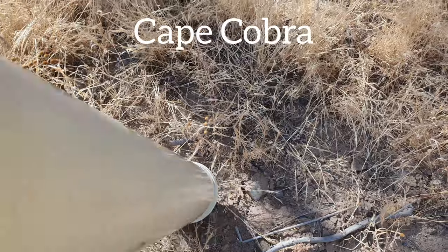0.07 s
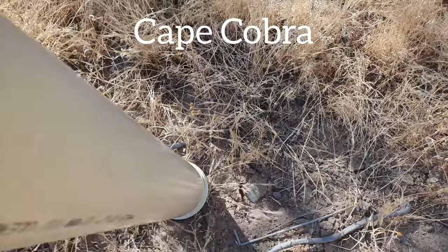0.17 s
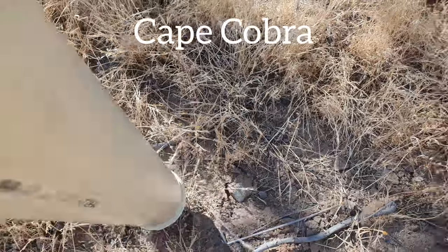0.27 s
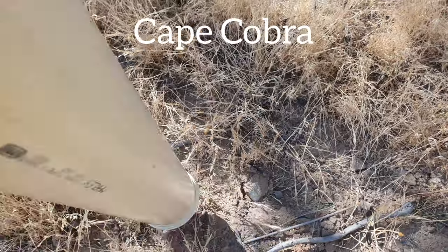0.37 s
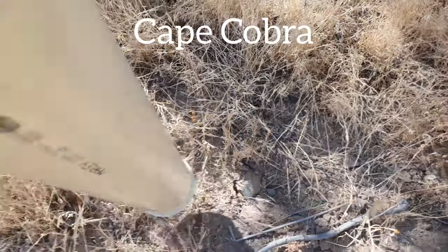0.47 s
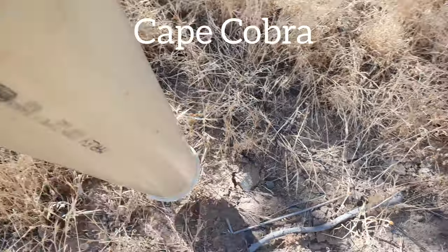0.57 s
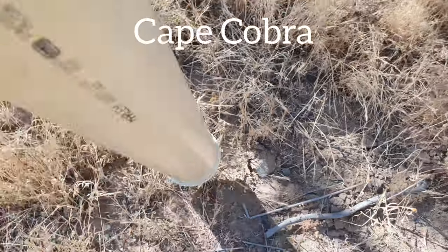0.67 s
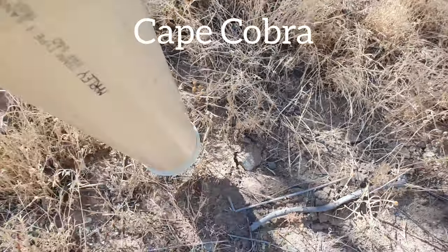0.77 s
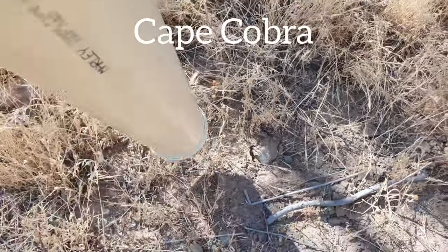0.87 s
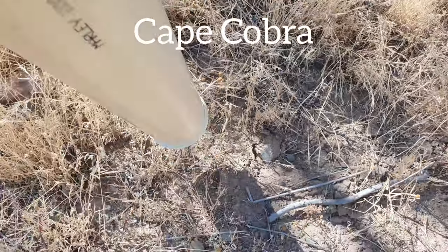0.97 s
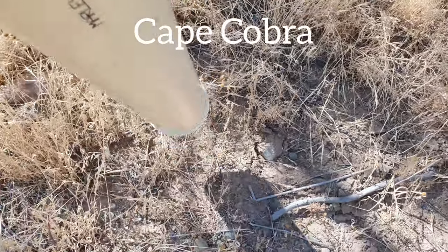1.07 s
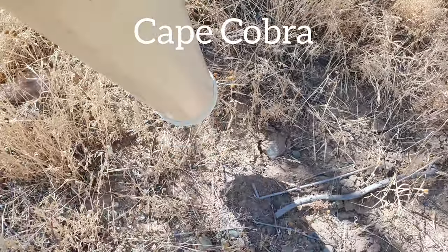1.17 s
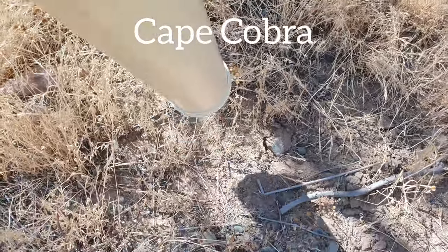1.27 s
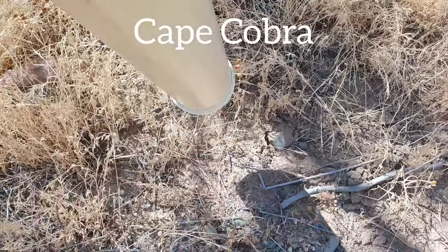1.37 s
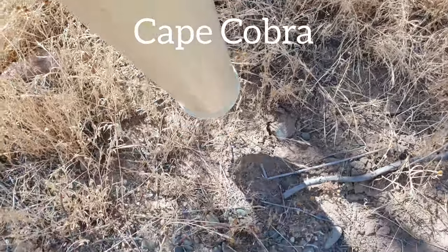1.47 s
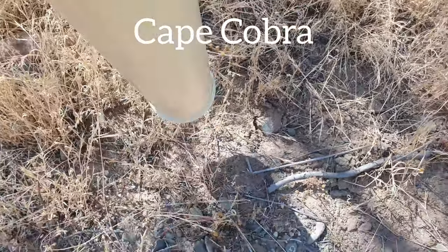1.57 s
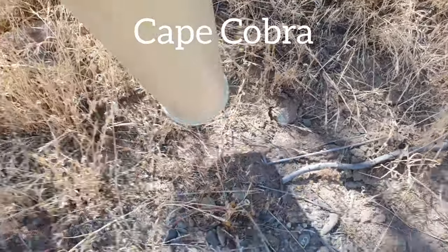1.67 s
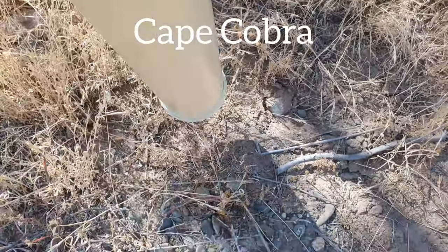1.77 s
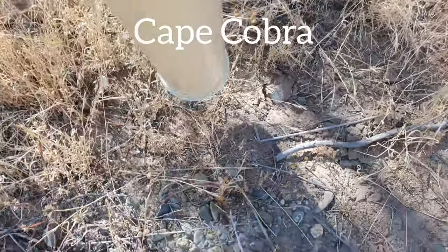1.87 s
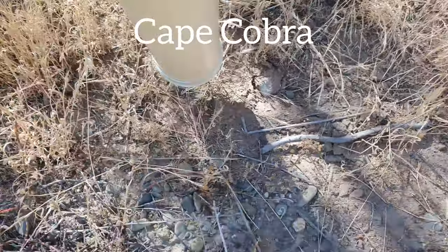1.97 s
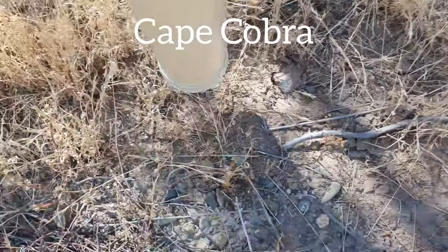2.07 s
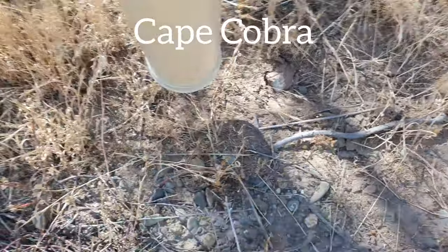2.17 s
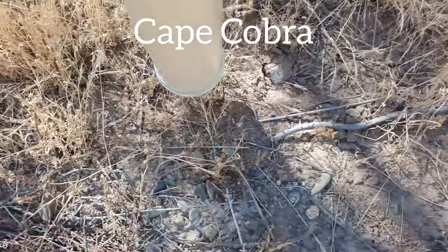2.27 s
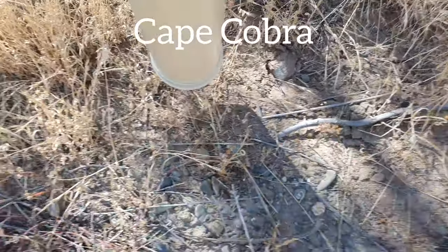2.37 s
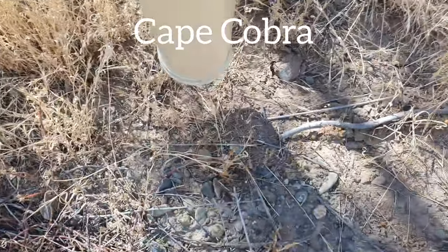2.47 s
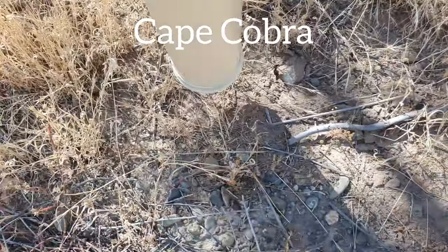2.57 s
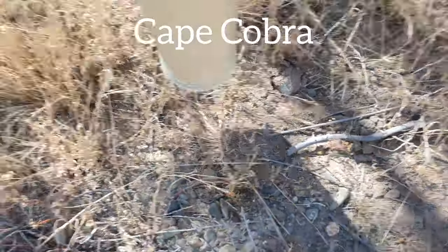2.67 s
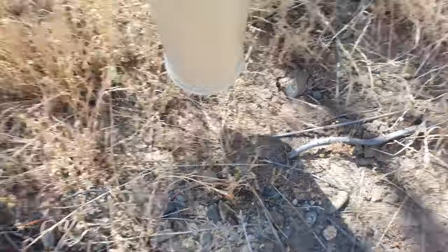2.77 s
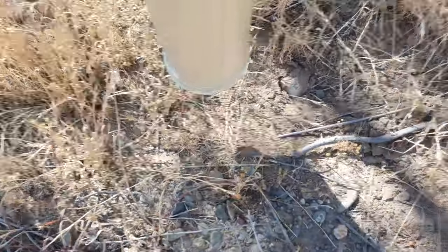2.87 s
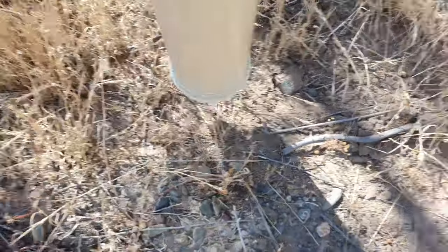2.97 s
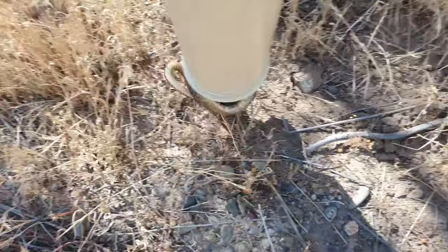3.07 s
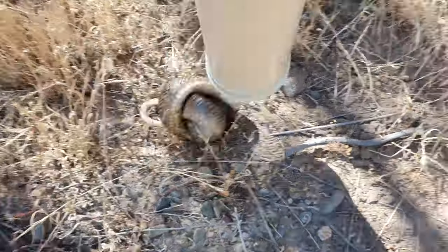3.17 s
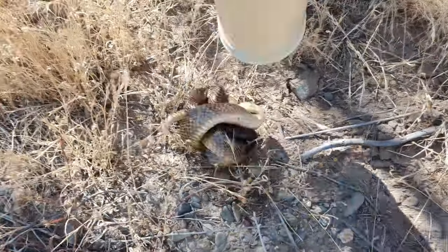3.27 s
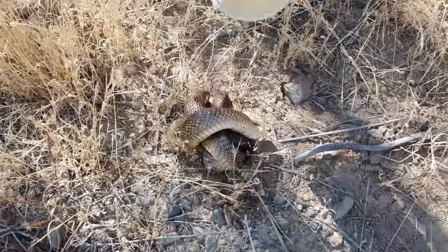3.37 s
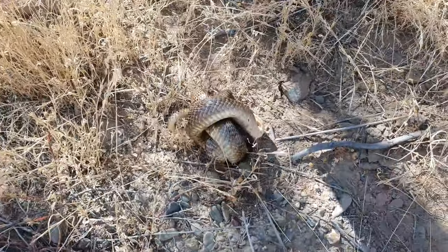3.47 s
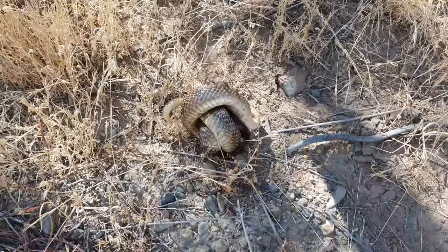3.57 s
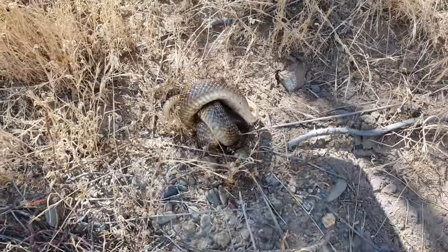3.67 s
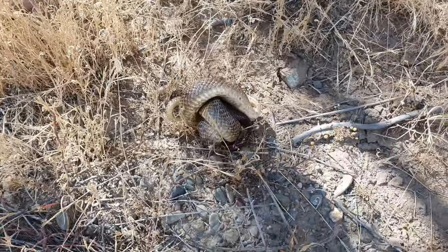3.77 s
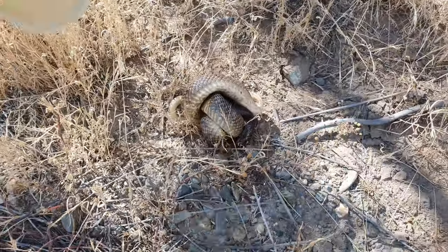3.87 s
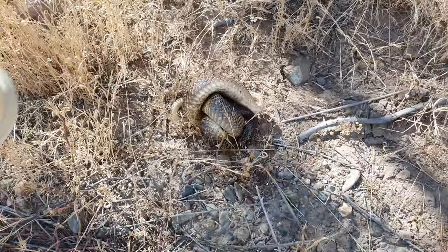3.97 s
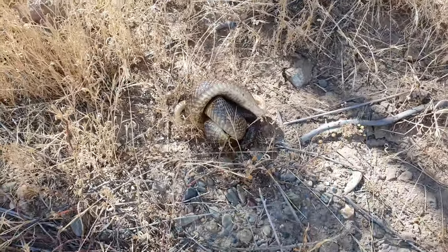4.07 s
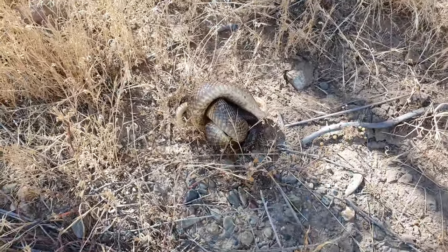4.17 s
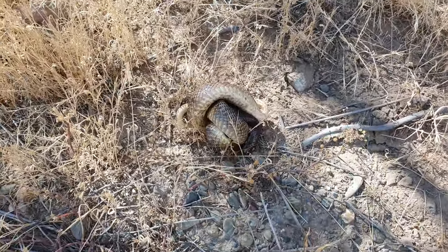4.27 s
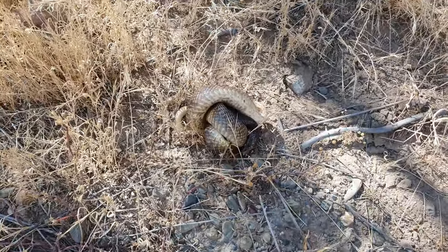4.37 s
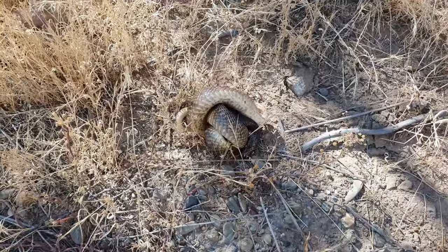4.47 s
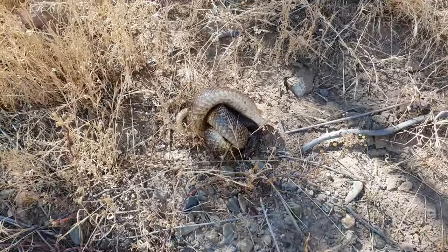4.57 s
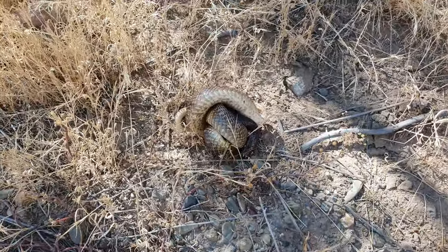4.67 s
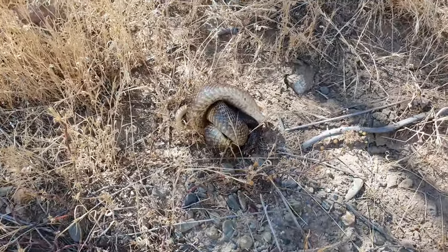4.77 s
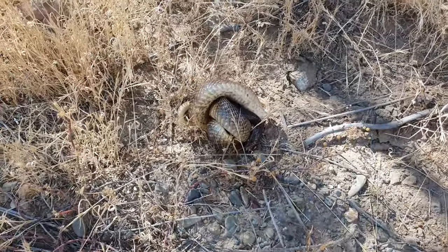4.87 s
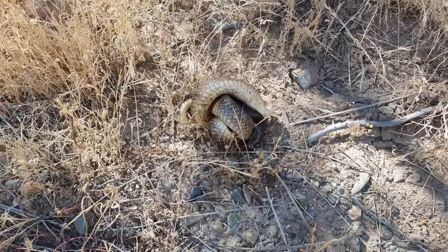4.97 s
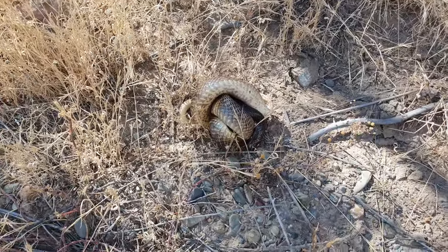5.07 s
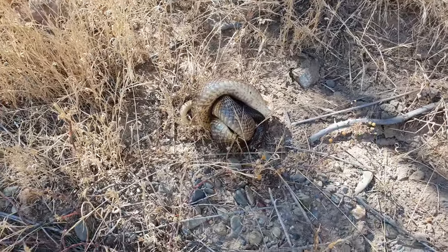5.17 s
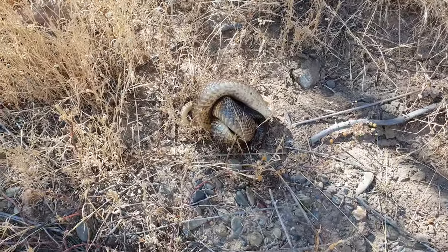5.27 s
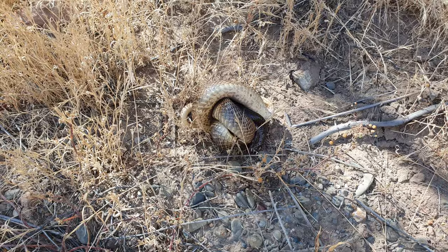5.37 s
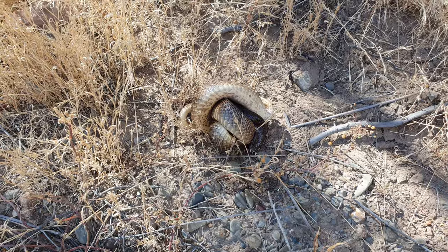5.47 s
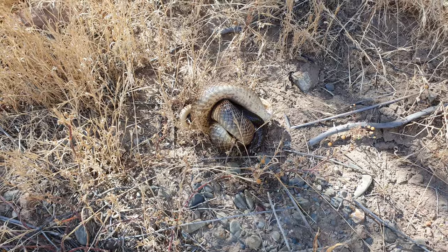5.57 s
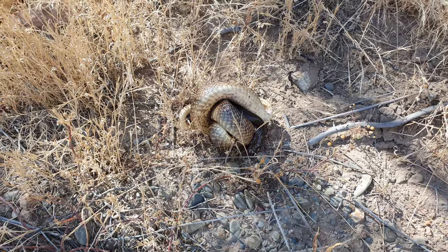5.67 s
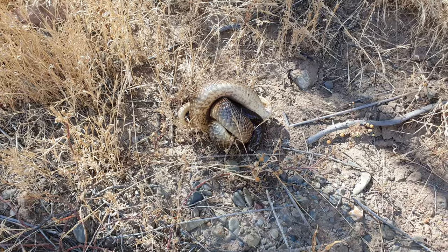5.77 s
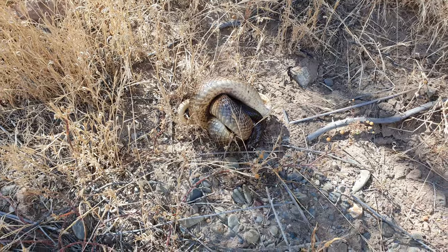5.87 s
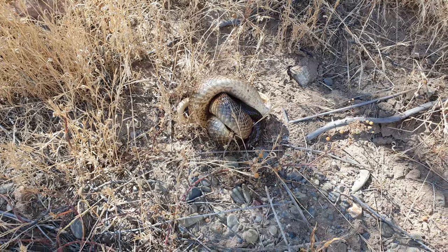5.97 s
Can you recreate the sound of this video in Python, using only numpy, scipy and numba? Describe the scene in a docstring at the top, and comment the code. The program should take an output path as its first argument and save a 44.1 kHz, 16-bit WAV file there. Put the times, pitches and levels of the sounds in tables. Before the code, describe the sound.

From 0 s a plastic tube is shaken close to a handheld stereo microphone outdoors. Short swells of dry hiss and scaly scraping come about seven a second, strongest at the start and leaning left, with a hollow ring inside the tube and a low rustle beneath. Gusty wind rumbles and slaps the microphone, heaviest until about 1.6 s and again around 2.1-2.8 s. Stones crack near 0.15 and 0.43 s, then hollow knocks cluster around 3.05 s as the load slides out. The shaking and wind fade by 3.5-4 s, exposing a thin, high cicada buzz, present throughout, and two very faint bird whistles near 3.9 and 4.1 s. From 4.25 s ticks build into sharp gravel snaps and gritty crunches, brightest at 4.6 s and dense again at 4.83-5 s, ringing the tube wall over a faint low hollow hum. Sparse small clicks follow to 6 s over a quiet open-country murmur.

```python
"""A plastic tube is shaken to slide a coiled snake out onto dry grass, then is set down on gravel.
Each shake is a swell of tiny random contacts that hisses, scrapes and rings the air in the tube.
Wind is shaped noise with sudden dips at two microphone ports; a cicada is a buzz of fast clicks.
Stones and stems snap as short noise bursts that ring the tube, over a quiet open-country murmur.
Later come a far bird's dipping whistles, dense grit, and a low note from the tube's air column."""
import sys
import numpy as np
from scipy import signal
from scipy.fft import rfft, irfft, next_fast_len
from scipy.io import wavfile
from scipy.ndimage import uniform_filter1d
from numba import njit

SR = 44100
rng = np.random.default_rng(int(sys.argv[2]) if len(sys.argv) > 2 else 0)


def wrap_up_sound(samples):
    """Save the sound to the file named by the first command line argument, as 16-bit audio."""
    columns = np.atleast_2d(samples).T
    # keep every value between -1 and 1, then stretch to whole-number steps
    tamed = np.clip(columns, -1, 1)
    steps = np.round(tamed * 32767).astype(np.int16)
    wavfile.write(sys.argv[1], SR, steps)


N = 265482
T = np.arange(N) / SR  # time of every sample, s


def undb(db):
    """Turn decibels into a plain gain."""
    return 10 ** (np.asarray(db) / 20)


def unit(x):
    """Scale to an rms (average strength) of 1."""
    return x / np.sqrt(np.mean(x ** 2))


def curve(rows):
    """Join each column of a table by straight lines in time; levels are silent outside it."""
    s, *columns = np.transpose(rows)
    return [np.interp(T, s, c, left=-120, right=-120) for c in columns]


def colour(x, points):
    """Make some pitches stronger than others, following (Hz, dB) points."""
    size = next_fast_len(N)
    hz, db = np.transpose(points)
    bin_hz = np.arange(size // 2 + 1) * SR / size
    gain = undb(np.interp(np.log(bin_hz + 1), np.log(hz), db))
    return irfft(rfft(x, size) * gain, size)[..., :N]


def ring(x, modes):
    """Add up resonances of a struck body, neighbours in opposite sign."""
    total = 0
    for k, (hz, width, db) in enumerate(modes):
        tone = signal.lfilter(*signal.iirpeak(hz, hz / width, SR), x)
        total = total + (-1) ** k * undb(db) * tone
    return total


def band(x, lo_hz, hi_hz):
    """Keep mainly the pitches between two limits (Butterworth band-pass)."""
    return signal.sosfilt(signal.butter(2, [lo_hz, hi_hz], "band", fs=SR, output="sos"), x)


@njit
def svf(x, hz, width):
    """Resonance whose centre can move every sample (state-variable band-pass)."""
    y, b, l = np.empty(len(x)), 0., 0.
    for i in range(len(x)):
        g, k = np.tan(np.pi * hz[i] / SR), width / hz[i]
        v = (b + g * (x[i] - l)) / (1 + g * (g + k))
        b, l, y[i] = 2 * v - b, l + 2 * g * v, k * v
    return y


def walk(rate):
    """Random levels, rate per second, smoothed into a wandering curve with a spread near 1."""
    k = int(SR / rate)
    steps = np.repeat(rng.standard_normal(N // k + 1), k)
    return 1.296 * uniform_filter1d(uniform_filter1d(steps, k), k)[:N]


def grains(rate, spread_db):
    """Tiny random contacts, rate per second: few large, many small, none huge."""
    chance = rng.random((3, N))
    hit, sign = chance[0] < rate / SR, np.sign(chance[1] - .5)
    size = undb(-spread_db * np.log(1.003 - chance[2]))
    return unit(hit * sign * size)


def ports(source, alike, lead):
    """A shared sound reaches the left port lead samples early; the rest differs between ports."""
    shared, alike = source(), np.clip(alike, 0, 1)
    pair = np.array([shared, np.roll(shared, int(round(lead)))])
    return np.sqrt(alike) * pair + np.sqrt(1 - alike) * np.array([source(), source()])


def split(pan_db):
    """Left and right gains of unrelated sounds whose mean has gain 1."""
    return 2 / np.sqrt(1 + undb(np.array([-pan_db, pan_db])) ** 2)


# Shakes of the tube, levels before each layer's trim:
# [start t/s, length/s, hiss level/dB, scrape over hiss/dB, hollow ring over hiss/dB]
SHAKE_STROKES = [(0.152, 0.1, -43, 2, 6.5), (0.381, 0.056, -46.5, 3.5, -5), (0.464, 0.031, -65.5, 7, 12.5),
                 (0.528, 0.084, -45.5, 1, 0.5), (0.693, 0.063, -47.5, 3.5, -4.5),
                 (0.826, 0.06, -52.5, 4.5, -5), (0.963, 0.064, -50.5, 3.5, -12),
                 (1.099, 0.06, -58.5, 6.5, -8), (1.223, 0.047, -63.5, 9, -4), (1.353, 0.059, -51, 5.5, -14),
                 (1.487, 0.089, -51, 5.5, 1), (1.632, 0.061, -52.5, 4.5, -4), (1.78, 0.08, -53, 0.5, -1),
                 (1.938, 0.089, -49, 3, 10.5), (2.102, 0.065, -52.5, 2.5, 0.5), (2.235, 0.087, -51, 2, 6.5),
                 (2.392, 0.083, -50, 2, 2.5), (2.506, 0.035, -69, 15, 12), (2.571, 0.097, -49.5, 5.5, 6.5),
                 (2.759, 0.088, -56.5, 0, 3), (2.976, 0.068, -58, 9, 17), (3.035, 0.052, -53.5, 7, 18),
                 (3.124, 0.075, -55.5, -2.5, 3), (3.229, 0.052, -55.5, -12, -7),
                 (3.342, 0.15, -62.5, 1.5, -1.5), (3.56, 0.12, -69.5, -13, -6),
                 (3.722, 0.11, -69.5, -0.5, -1.5), (3.907, 0.12, -75, -3, -6), (4.246, 0.031, -78, 14, -6)]
# Low rustle running under and between the shakes, before the scrape trim: [t/s, level/dB]
LOW_RUSTLE = [(0, -50), (0.2, -54), (0.33, -58.5), (0.66, -58), (1.3, -65.5), (1.9, -54.5), (2.6, -60.5),
              (2.9, -54.5), (3.3, -60.5), (3.5, -77), (4.15, -82), (4.3, -73)]
# The tube swings from the left to the front: [t/s, hiss left minus right/dB]
TUBE_SWING = [(0, 9), (1.2, 15), (1.8, 6), (2.9, 4), (3.2, -1), (6.02, 2)]
# The air space in front of the sliding load: [t/s, resonance f/Hz, overtone level/dB]
AIR_SPACE = [(0, 437, 1.5), (.6, 473, -6), (1.5, 309, -20), (1.9, 330, -25), (2, 401, -18),
             (2.27, 488, -27), (2.6, 383, -9.5), (3, 329, -22), (6.02, 350, -18)]
# Tone colour of the scraping: [f/Hz, level/dB]
SCRAPE_COLOUR = [(900, -8), (1400, -12), (1900, -5), (2750, -3.5), (3900, -0.5), (4700, -4), (5600, -8),
                 (6600, -5.5), (7700, -15.5), (9000, -18.5)]
# Tone colour of the hiss, used for the grit's treble too: [f/Hz, level/dB]
HISS_COLOUR = [(6000, -12.5), (8000, -11), (10000, -7.5), (12500, -3), (15800, -3.5)]


def shakes():
    """Each stroke speeds the load up and stops it: a flat-topped swell drives hiss, scrape and ring."""
    hiss, scrape, hollow = np.zeros(N), undb(curve(LOW_RUSTLE)[0]), np.zeros(N)
    for s, length, db, scrape_db, ring_db in SHAKE_STROKES:
        at = slice(max(int((s - length) * SR), 0), int((s + 2 * length) * SR))
        from_middle = np.abs((T[at] - s) / length * 2 - 1)
        stroke = undb(db + 3.5 - 6.35 * from_middle ** 2.58)
        hiss[at] += stroke
        scrape[at] += undb(scrape_db) * stroke
        hollow[at] += undb(ring_db) * stroke
    catch = walk(60)  # the scales catch and slip, so hiss and scrape flicker together
    hiss_noise = unit(colour(ports(lambda: grains(12000, 3.1), 0.14, 24), HISS_COLOUR))
    out = undb(2.5 * catch) * hiss * split(curve(TUBE_SWING)[0]) * hiss_noise
    scrape_noise = unit(colour(ports(lambda: grains(6000, 1.84), 0.083, 20), SCRAPE_COLOUR))
    out += undb(1.0 + 2.48 * catch) * scrape * scrape_noise
    out[1] -= 0.59 * ring(out[1], [(2650, 1160, 0)])  # this band is weaker at the right port
    rub = undb(2.0 * walk(39.93)) * hollow * ports(lambda: grains(1500, 4.06), 0.86, 8.27)
    hz, over_db = curve(AIR_SPACE)
    # the closed air space rings at its note and near four times higher
    boom = np.array([svf(x, hz, 28.8) + undb(over_db) * svf(x, 3.98 * hz, 185.0) for x in rub])
    return out + undb(21.5) * boom + undb(5) * band(rub, 194, 1690)


# Gusting wind on the ports, under the eddies: [t/s, level/dB, left minus right/dB]
GUSTING_WIND = [(0, -50.5, -3), (.3, -37.5, 15), (.6, -37.5, 10), (.8, -37.5, -0.5), (1.05, -45, -2),
                (1.25, -36.5, 8), (1.5, -35, 9), (1.75, -52.5, 3), (2.05, -51, 2), (2.4, -42, 2),
                (2.8, -41, 4), (3.2, -53, 9), (3.6, -53.5, 21), (4, -65, -8), (4.28, -68.5, -6),
                (4.6, -47, 9), (4.7, -65.5, 2), (4.9, -49.5, 0), (5.2, -67, 6), (6.02, -65.5, 2)]
# Eddies that slap the ports, slap level before its filter and trim:
# [t/s, slap level/dB, left minus right/dB, rumbling wake level/dB]
EDDY_SLAPS = [(0.061, -44, -11, -35.5), (0.152, -33, 6, -23), (0.325, -31, -4, -33), (0.35, -21, 29, -30),
              (0.398, -25.5, 17, -17), (0.476, -17.5, 22, -19), (0.55, -40, 21, -21), (0.63, -46, 10, -30),
              (0.679, -30, 23, -26.5), (0.781, -36, -18, -33.5), (0.841, -30, -18, -38),
              (0.991, -48, -4, -35), (1.087, -38, 21, -33), (1.186, -32.5, 18, -27.5),
              (1.259, -26, 16, -31.5), (1.36, -39, 22, -32), (1.461, -39, 22, -31),
              (1.821, -45, -20, -33.5), (2.094, -23.5, -28, -24.5), (2.17, -39, -10, -36),
              (2.26, -31.5, -18, -24), (2.32, -46, 10, -26.5), (2.431, -43, -2, -36),
              (2.523, -35, -30, -23), (2.578, -38, -33, -20), (2.713, -53, -9, -27.5),
              (2.791, -47, -4, -29), (2.941, -47, 19, -35.5), (3.032, -42, -2, -29), (3.242, -48, 17, -46),
              (3.341, -29, 36, -38), (3.389, -54, 32, -30), (3.514, -40, 32, -32.5), (3.628, -54, 19, -41),
              (3.822, -58, -2, -45.5), (4.441, -55, -6, -49), (5.34, -69, -2, -44), (5.396, -50, -15, -44)]
# Tone colour of the wind's rumble: [f/Hz, level/dB]
WIND_COLOUR = [(12, -56), (25, -15), (43, -4.5), (62, 4.5), (100, -3.5), (160, -17), (250, -25.5),
               (500, -44), (1000, -59)]
WAKE_RISE_S, WAKE_FALL_S = .012, 0.036


def wind():
    """Unrelated, lumpy turbulence on each port; eddies add a sharp pressure dip and a rumbling wake."""
    db, pan_db = curve(GUSTING_WIND)
    lumps = np.array([undb(1.88 * walk(24.94)) * colour(rng.standard_normal(N), WIND_COLOUR)
                      for _ in range(2)])
    slap, power = np.zeros((2, N)), (undb(db) * split(pan_db)) ** 2
    u = np.arange(-400, 400) / SR / .0022  # time around a dip, in units of 2.2 ms
    for s, peak_db, side_db, wake_db in EDDY_SLAPS:
        at = int((s + 0.00854) * SR)
        slap[:, at - 400:at + 400] -= np.outer(undb(peak_db) * split(side_db), np.exp(-u ** 2))
        near = slice(max(at - 6000, 0), at + 12000)
        late = T[near] - at / SR
        wake = np.exp(-np.abs(late) / np.where(late < 0, WAKE_RISE_S, WAKE_FALL_S))
        power[:, near] += np.outer(undb(wake_db) * split(side_db), wake) ** 2
    return np.sqrt(power) * unit(lumps) + undb(8) * band(slap, 61, 570)


# How fast the cicada clicks, before its small sway: [t/s, click rate f/Hz]
CICADA_RATE = [(0, 378.5), (1.25, 395.2), (1.75, 399), (1.95, 399), (2.35, 376.5), (2.5, 371),
               (2.85, 364.8), (3.4, 364.5), (4.1, 365.8), (5, 373.1), (6.02, 383.5)]
# Loudness of the cicada's clicks, before the left/right offset: [t/s, level/dB]
CICADA_LEVEL = [(0, -62.5), (0.4, -61.5), (2, -59), (3, -54), (3.4, -65), (3.8, -59.5), (4, -65.5),
                (4.4, -58), (4.7, -61), (6.02, -62.5)]
# Ringing of the insect's body: [f/Hz, level/dB]
CICADA_COLOUR = [(5500, -26), (6100, -16), (6500, -7), (6950, -3), (7300, -5), (7650, -5), (7950, -5.5),
                 (8400, -19.5), (8900, -36), (10000, -50)]
BLUR = .42  # gain of the blurred hiss beside the clicks


def cicada():
    """Regular clicks ring the body; a slower beat sways timing and strength; others blur into a hiss."""
    beat = 2 * np.pi * np.cumsum(57 + 1.2 * walk(3)) / SR  # about 57 Hz
    phase = np.cumsum(curve(CICADA_RATE)[0] * (1 + .0006 * walk(30))) / SR + .0055 * np.sin(beat + 1)
    clicks = np.zeros(N)
    for k in range(15, 26):  # multiples of the click rate
        flicker = undb(4 * walk(2) + 1.5 * walk(50))
        clicks += flicker * np.cos(2 * np.pi * k * (phase + k * .07))
    near = unit(colour(clicks * (1 + .4 * np.cos(beat)), CICADA_COLOUR))
    far = unit(colour(rng.standard_normal((2, N)), CICADA_COLOUR))
    level = undb(curve(CICADA_LEVEL)[0] + np.array([[-1.1], [1.1]]))  # a little louder at right
    return level * (np.array([near, np.roll(near, shift=20)]) + BLUR * far)


# Tone colour of the open-country murmur: [f/Hz, level/dB]
FIELD_COLOUR = [(60, -6), (130, 2.5), (300, -6.5), (700, 0.5), (1100, -10), (1800, -2.5), (2600, -23),
                (5000, -22), (9000, -21.5), (15800, -50)]
FIELD_DB = -62.5  # middle of a slightly wandering level


def field():
    """Open-country murmur and the phone's own hiss, as one shaped noise."""
    murmur = colour(ports(lambda: rng.standard_normal(N), 0.47, -10.5), FIELD_COLOUR)
    return undb(FIELD_DB + 0.13 * walk(2.4)) * unit(murmur)


# Single stones and stems snapping, levels before each layer's trim:
# [t/s, level/dB, crack f/Hz, hollow ring over level/dB, treble over level/dB, crumbling decay/ms]
STONE_SNAPS = [(0.1541, -17, 1870, -3.5, -23, 3.6), (0.435, -24.5, 1820, -5, -9, 1.5),
               (2.713, -34.5, 4450, -6, -16, 1), (3.019, -21, 1530, -2, -16.5, 2.3),
               (3.0505, -20.5, 1930, -3.5, -25, 2.2), (3.0648, -20.5, 3770, -11, -23, 2.3),
               (3.2585, -38, 4060, -6, -4, 1.8), (3.338, -37, 4500, -26, 3, 1.2),
               (3.5, -49, 5060, -15, -14, 1), (4.2577, -41.5, 2230, -22, -23, 1.3),
               (4.3193, -34.5, 3450, -31, -21, 3.6), (4.3481, -36.5, 2270, -15, -20, 1.5),
               (4.437, -36, 3370, -17, -19, 1.2), (4.4718, -34, 3420, -29, -24, 1.4),
               (4.5114, -33, 2150, -20, -19, 1.8), (4.5467, -28, 1560, -11, -17, 1.3),
               (4.5571, -22.5, 2420, -5.5, -11, 1.7), (4.568, -18.5, 2420, -8.5, -18, 2.4),
               (4.5933, -26, 2240, -6, -20, 1.5), (4.6116, -12.5, 2620, -13.5, -8.5, 0.87),
               (4.6188, -25, 2420, -23, -21, 1.7), (4.6457, -28.5, 2270, 0, -33, 1.3),
               (4.762, -40, 3830, -4, -26, 2.7), (4.7937, -39.5, 1980, 2, -22, 1.5),
               (4.829, -22, 3300, -10, -26, 4.4), (4.8441, -21.5, 2220, -17, -8, 1.4),
               (4.8577, -27, 2260, -0.5, -20, 4.9), (4.8682, -17.5, 2280, -0.5, -9, 1.9),
               (4.882, -22, 1610, -5.5, -19, 1.9), (4.9267, -21, 3200, -17, -12, 1.9),
               (4.943, -19, 2380, -4, -9, 1.8), (4.98, -24, 2250, -15, -31, 2.8),
               (5.001, -33, 2230, -17, -26, 1.8), (5.061, -48, 900, 0, -32, 1.5),
               (5.084, -29, 2800, -9.5, -31, 4.3), (5.137, -39.5, 3300, -6, -28, 2.9),
               (5.192, -40, 4200, -30, -16, 1.1), (5.2435, -46, 2580, -18, -28, 1.3),
               (5.2606, -39.5, 2300, -15, -32, 1.8), (5.4396, -40.5, 2170, -15, -36, 2.1),
               (5.553, -50, 2500, -21.5, -30, 1.4), (5.8769, -30.5, 2300, -11, -35, 0.95),
               (5.97, -34, 1960, -2, -32, 1.3)]
# Ringing of the tube wall, used for the grit too: [f/Hz, width/Hz, level/dB]
WALL_MODES = [(1636, 61, 5.5), (1934, 50, 5), (2254, 117, 6), (2527, 38, 8), (2665, 17, 2.5),
              (3340, 245, -1), (3670, 560, -16), (4870, 33, -25), (6150, 170, -14)]
# Low ringing of the tube's hollow, used for the grit too: [f/Hz, width/Hz, level/dB]
HOLLOW_MODES = [(308, 48, -11), (597, 74, -11.5), (726, 69, -6), (1180, 37, -0.5)]
BREAK = 4  # size of the first crack beside its crumbling
SNAP_WALL_DB = 5  # trim of the wall ring


def snaps():
    """Each snap is a crack with a crumbling noise tail that knocks the tube wall and its hollow."""
    out, knock, low, high = (np.zeros((2, N + 2000)) for _ in range(4))
    fade = np.arange(1000) / SR
    # the right port hears each snap 13 samples late
    at = np.array([[0], [1]]), np.array([[0], [13]]) + np.arange(len(fade))
    burst = rng.standard_normal((len(STONE_SNAPS), 3, len(fade)))
    for (s, db, hz, ring_db, treble_db, ms), (both, *own) in zip(STONE_SNAPS, burst):
        crack = (both + .5 * np.array(own)) * np.exp(-fade * 1000 / max(ms, .2))
        crack[:, :2] += BREAK * np.array([1, .3])
        crack *= undb(db) / np.sqrt((crack ** 2).sum(-1, keepdims=True) / 30)  # even out the energy
        here = at[0], at[1] + int(s * SR)
        out[here] += undb(2.5) * band(crack, hz / 1.63, hz * 1.644)
        knock[here] += crack
        low[here] += undb(ring_db) * crack
        high[here] += undb(treble_db) * crack * np.exp(-fade / 0.00077)
    out = out[:, :N] + undb(SNAP_WALL_DB) * ring(knock[:, :N], WALL_MODES)
    out += undb(23.5) * ring(low[:, :N], HOLLOW_MODES)
    return out + undb(.1) * band(high[:, :N], 3700, 14200)


# Far whistles, levels before a random flicker:
# [t/s, length/s, start f/Hz, f at 60 % of the length/Hz, end f/Hz, level/dB]
BIRD_PEEPS = [(3.89, .1, 6300, 5350, 5550, -76), (4.07, .11, 5250, 5100, 5200, -76)]


def bird():
    """Faint whistles: pure tones that dip in pitch along a smooth curve."""
    out = np.zeros(N)
    for s, length, start_hz, low_hz, end_hz, db in BIRD_PEEPS:
        u = np.clip((T - s) / length, 0, 1)
        hz = np.polyval(np.polyfit([0, .6, 1], [start_hz, low_hz, end_hz], deg=2), u)
        swell = np.sqrt(np.sin(np.pi * u) + 1e-12)
        out += undb(db) * swell * np.sin(2 * np.pi * np.cumsum(hz) / SR)
    return out * undb(3.7 * walk(150))


# The tube pressed into grit, a swell to a peak and a fade, levels before each layer's trim:
# [peak t/s, level/dB, treble over level/dB, rise/(dB/s), fall/(dB/s)]
GRIT_CRUNCH = [(4.45, -59.5, -9.5, 67, 44), (4.601, -40, -16, 153, 333), (4.86, -41.5, -16, 500, 255),
               (4.95, -51.5, -12, 194, 157), (5.1, -73, -19, 95, 20), (5.89, -65.5, -21, 297, 36)]
GRIT_HOLLOW_DB = -4.5  # hollow ring beside the wall ring


def grit():
    """Dense tiny contacts knock the tube wall and its hollow, with a hiss of finer ones on top."""
    body, treble = np.zeros(N), np.zeros(N)
    for s, db, treble_db, rise, fall in GRIT_CRUNCH:
        swell = undb(db - np.where(T < s, rise * (s - T), fall * (T - s)))
        body += swell
        treble += undb(treble_db) * swell
    contacts = ports(lambda: grains(900, 4.87), 0.6, 11.6)
    wall = unit(ring(contacts, WALL_MODES) + undb(-6.5) * band(contacts, 2450, 5000))
    hollow = unit(ring(contacts, HOLLOW_MODES))
    out = undb(4.5) * body * (wall + undb(GRIT_HOLLOW_DB) * hollow)
    hiss = unit(colour(ports(lambda: grains(2800, 1.7), 0.15, 10), HISS_COLOUR))
    return out + undb(8.0) * treble * hiss


PIPE_HZ, PIPE_DB = 113.5, -53.5
PIPE_S, PIPE_ATTACK_S, PIPE_HOLD_S, PIPE_RELEASE_S = 4.8, 0.036, 0.32, .05


def air_column():
    """The tube's air column sounds: noise through one narrow resonance, the same at both ports."""
    corners = np.cumsum([PIPE_S, PIPE_ATTACK_S, PIPE_HOLD_S, PIPE_RELEASE_S])
    blown = np.interp(T, corners, [0, 1, 1, 0])
    return undb(PIPE_DB) * blown * unit(ring(rng.standard_normal(N), [(PIPE_HZ, 6, 0)]))


def scene():
    """All sources together."""
    return shakes() + wind() + cicada() + field() + snaps() + bird() + grit() + air_column()


TOP_HZ = 15800


def record(dry):
    """The phone cuts the top: a steep low-pass filter."""
    return signal.sosfilt(signal.ellip(10, .2, 60, TOP_HZ, fs=SR, output="sos"), dry)


dry = scene()
out = record(dry)
wrap_up_sound(out)
```